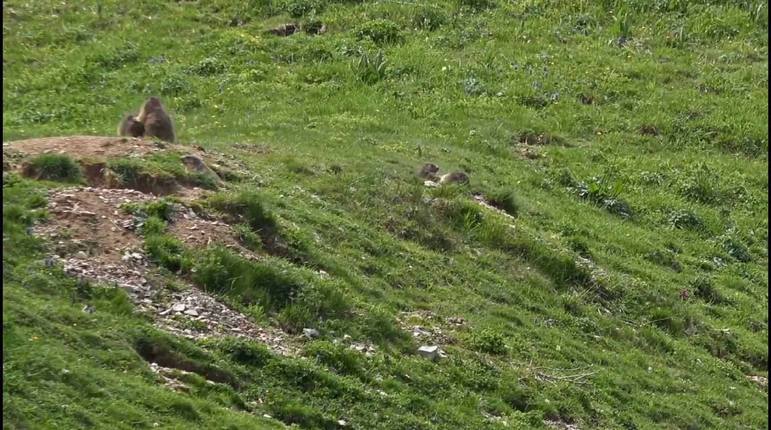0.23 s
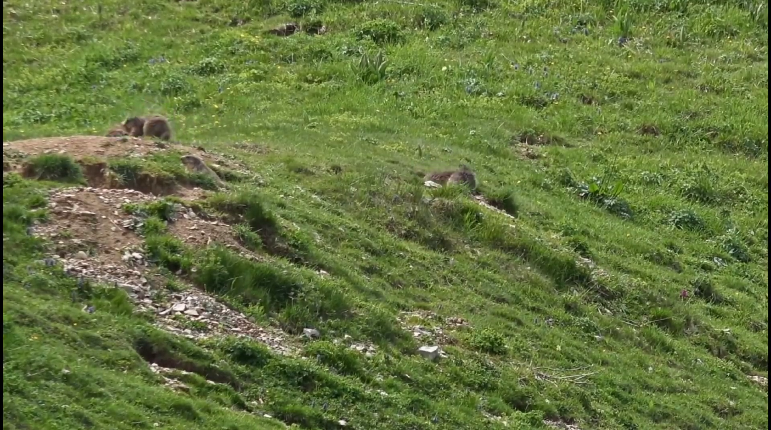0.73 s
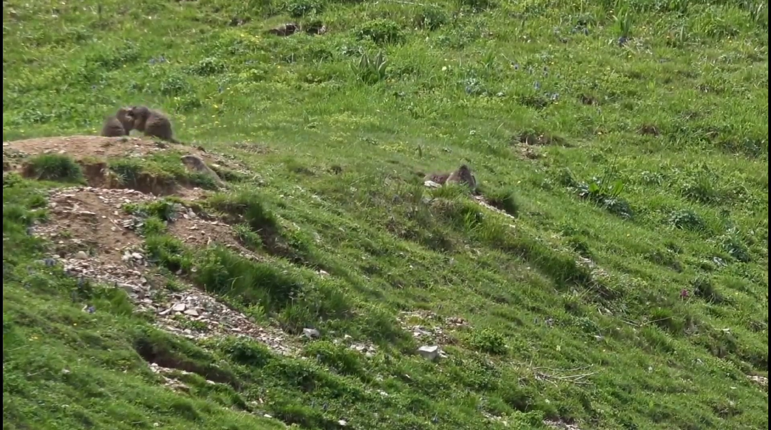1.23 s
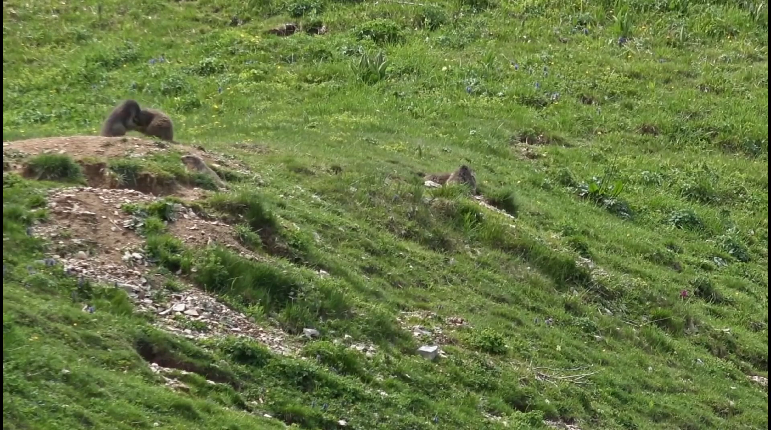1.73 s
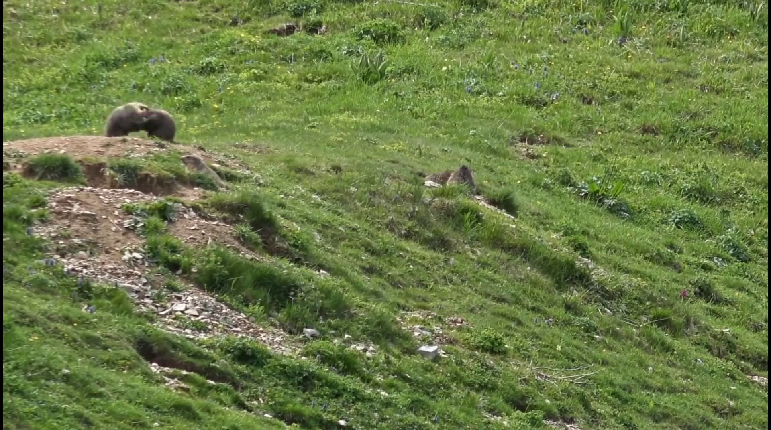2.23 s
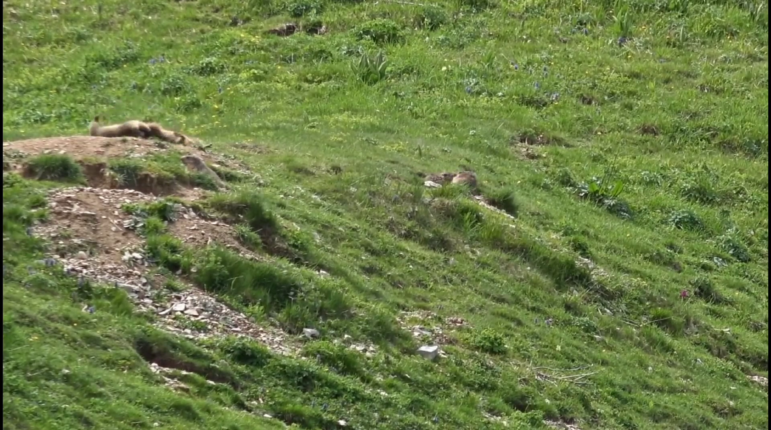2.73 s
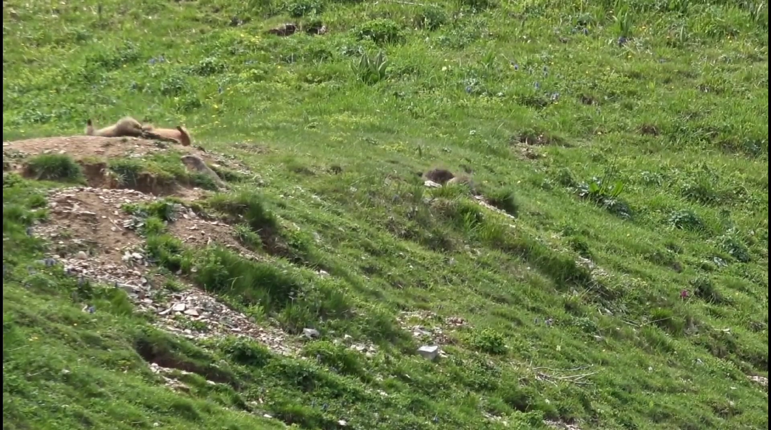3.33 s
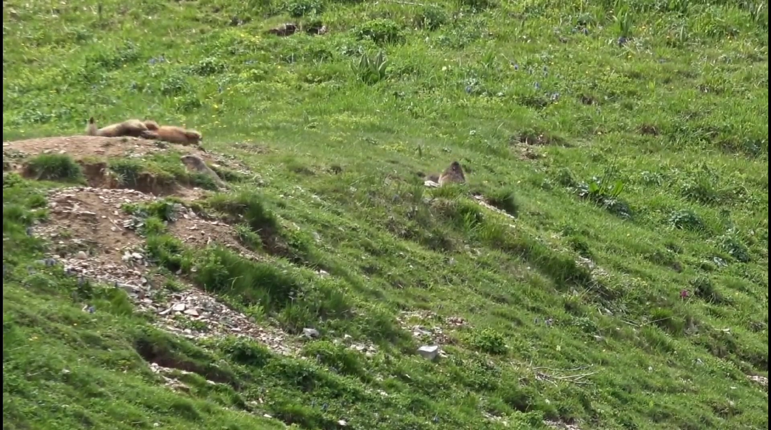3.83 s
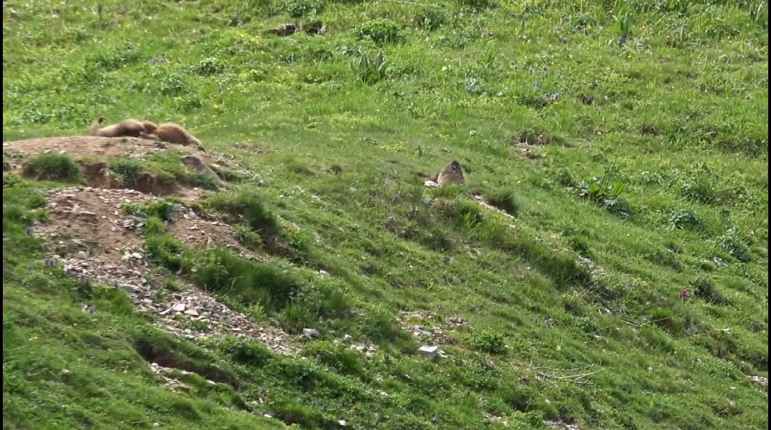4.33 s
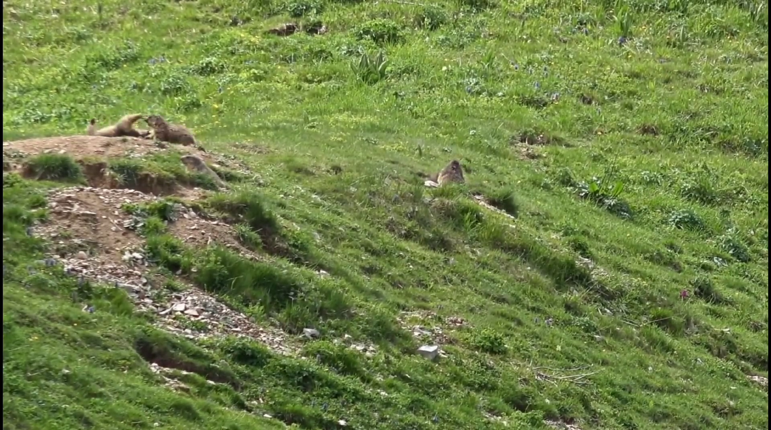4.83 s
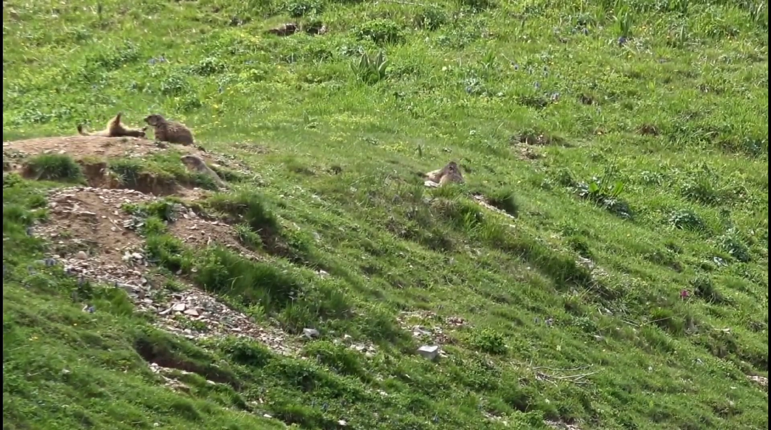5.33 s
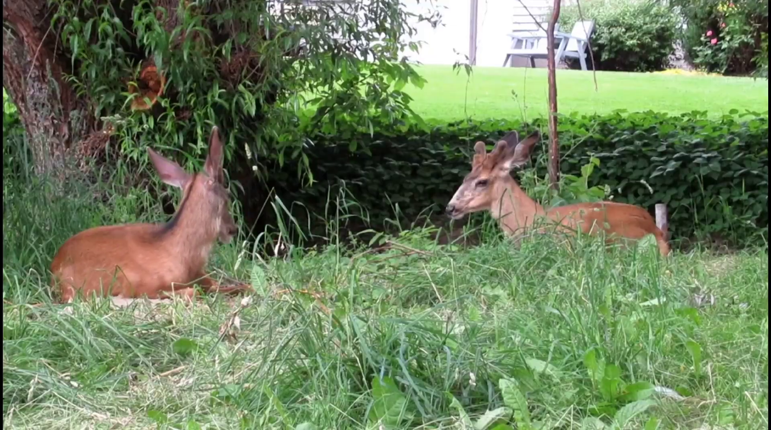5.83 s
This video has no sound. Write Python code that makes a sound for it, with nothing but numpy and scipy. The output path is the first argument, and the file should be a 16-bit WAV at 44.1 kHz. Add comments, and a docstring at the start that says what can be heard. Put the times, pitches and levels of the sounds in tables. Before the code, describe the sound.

Short, high marmot whistles repeat rapidly, each rising, falling and ending hoarse, over soft outdoor wind and faint, distant bird twitter. After a pause with one small click near the microphone comes a drawn-out squeal, then more whistles from ahead and the right, fading away with a slight echo off the slope. The background stops abruptly, and a deer's low, pulsing, chesty groan ends the scene.

```python
"""A mountain meadow in faint wind and hiss. Marmots squabble ahead of the microphone in a run of
short arched whistles, while a small bird twitters far off. Something clicks once, close by.
A long squeal opens a second run of whistles, which come by turns from the right and from ahead.
The meadow cuts to silence; then a large animal, perhaps a deer, gives a low groan a little to
the right, its slow glottal pulses ringing in chest and mouth."""
import sys
import numpy as np
from scipy import signal
from scipy.fft import rfft, irfft, next_fast_len
from scipy.io import wavfile
from scipy.ndimage import map_coordinates

SR = 44100
rng = np.random.default_rng(int(sys.argv[2]) if len(sys.argv) > 2 else 0)


def wav_out(sig):
    """Save sig, one row per channel (or a flat mono array), as 16-bit PCM at SR to the path in sys.argv[1]."""
    wavfile.write(sys.argv[1], SR, np.round(np.clip(np.atleast_2d(sig).T, -1, 1) * 32767).astype(np.int16))


N = 268613
TIME = np.arange(N) / SR

# Spectra of the wind with its hiss, and of the rumble under it: (frequency [Hz], relative level [dB])
WIND_SPECTRUM = [(20, -14), (60, 3), (90, -4), (130, -1.5), (200, -7.5), (450, -13), (750, -13),
                 (1100, -17), (2400, -26), (4000, -27), (8500, -26), (10000, -30.5), (12500, -28),
                 (15500, -30.5)]
RUMBLE_SPECTRUM = [(20, -12), (40, -13.5), (58, 4), (80, -7.5), (130, -13.5), (250, -29.5),
                   (1000, -90.5)]
# How alike the wind is on both sides of the microphone: (frequency [Hz], correlation [0-1])
WIND_LIKENESS = [(60, .6), (150, .85), (700, .85), (3000, 0.98), (8000, 0.22), (14000, 0.6)]
# Stereo balance of the wind, calls ahead and calls to the right: (frequency [Hz], left over right [dB])
WIND_BALANCE = [(60, -4), (160, -1), (430, -2), (1160, 0.5), (3130, 0.5), (8410, 0.0)]
AHEAD_BALANCE = [(60, -4.5), (140, 0.0), (310, -0.5), (710, 0.5), (1620, 0.5), (3690, -2.5), (8410, -5.0)]
RIGHT_BALANCE = [(60, -2.5), (140, -0.5), (310, -1.5), (710, -0.5), (1620, -2.5), (3690, -4.0), (8410, -10)]

# Marmot whistles; the six columns after the level are relative to it: (start [s], top [s], end [s],
# top pitch [Hz], level [dB], 2nd partial [dB], 3rd [dB], 4th [dB], upper partials [dB], soft start [dB],
# rasp [dB], side in the second run [0 ahead, 1 right])
WHISTLE_CALLS = [(-.075, -0.034, 0.033, 1454, -19, -6.5, -13.5, -15, -17.5, -12, -19, 0),
                 (.131, 0.158, .21, 1415, -16, -4.5, -17, -14.5, -21, -6.5, -23, 0.16),
                 (.308, .344, .4, 1529, -19, -10, -0.5, -9, -20.5, -15.5, -18, 0),
                 (.506, 0.542, 0.58, 1303, -23.5, 3.5, -2, -8, -17.5, -17, -17.5, 0),
                 (2.711, 2.745, 2.818, 1743, -28, -3.5, -12, -16, -17.5, -10, -23, 0.96),
                 (2.909, 2.948, 2.996, 1562, -23, -7, -12, -18.5, -14.5, -21.5, -25.5, 0.17),
                 (3.093, 3.134, 3.198, 1281, -24, -12.5, -18.5, -21.5, -21.5, -27, -27, 1),
                 (3.27, 3.311, 3.376, 1293, -21, -9.5, -17, -18.5, -14, -26, -28.5, 0.22),
                 (3.467, 3.505, 3.556, 1179, -25.5, -9.5, -7.5, -19, -10, -18.5, -30.5, 1),
                 (3.651, 3.694, 3.752, 1124, -28.5, -5, -6, -13.5, -9.5, -20.5, -27.5, 1),
                 (3.87, 3.9, 3.95, 1000, -38.5, -3, -7.5, -21, -13, -11.5, -22.5, 0.91),
                 (4.091, 4.122, 4.166, 996, -36, -4, -7.5, -18.5, -14, -15, -28.5, 1),
                 (4.301, 4.345, 4.396, 1059, -30.5, -3.5, -4.5, -22, -11, -15.5, -28, 1)]
# Throat resonances in a whistle, and the spectrum of hoarseness: (frequency [Hz], relative level [dB])
WHISTLE_THROAT = [(700, -1), (950, -6.5), (1300, -0.5), (1600, -4), (2050, -6.5), (2400, -6), (2850, -3.5),
                  (3150, -3.5), (3650, -2), (4150, -7.5), (4650, 0), (5400, -2.5), (8000, 6.5)]
RASP_SPECTRUM = [(500, -18.5), (750, -8.5), (1400, -8), (2000, -2), (2600, -1.5), (4300, -0.5), (7500, -5),
                 (8500, -14), (9500, -51.5)]
# Flips into the upper register: (up [s], down [s], pitch factor [ratio], level change [dB])
REGISTER_FLIPS = [(2.052, 2.191, 1.216, 3.5), (2.51, 2.547, 1.295, 3), (2.738, 2.756, 1.22, -4.5)]
# The voice tears beside a flip or as a hard call falls: (start [s], end [s], extra rasp [dB])
VOICE_TEARS = [(.168, .205, 4), (2.134, 2.205, 16.5), (2.479, 2.516, 11.5), (2.534, 2.582, 15.5),
               (2.75, 2.798, 9.5), (2.953, 3, 6.5)]

# Bouts of the distant bird: (start [s], phrases [count], phrase spacing [s], level [dB])
BIRD_BOUTS = [(.075, 1, 0, -58), (.58, 1, 0.021, -53), (1.2, 1, 0, -62.5), (1.465, 3, .215, -55),
              (2.6, 3, 0.23, -58), (3.525, 2, .243, -57.5), (4.235, 5, 0.27, -58)]
# The click near the microphone: (time [s], level [dB])
CLICK_HITS = [(1.593, -27)]
# Modes of the thing that clicks: (frequency [Hz], relative level [dB], time to fall 60 dB [s])
CLICK_MODES = [(1340, -16, 0.072), (1930, -6, 0.012), (2100, -2.5, 0.012), (4500, -8, 0.012),
               (7700, -1, 0.0067)]

# The trough in the middle of the squeal: (time [s], lower-register pitch [Hz])
SQUEAL_TROUGH = [(2.2, 1434), (2.242, 1366), (2.27, 1351), (2.316, 1247), (2.38, 1226), (2.458, 1243),
                 (2.482, 1315), (2.49, 1410)]
# Throat resonances in the squeal: (frequency [Hz], gain [dB])
SQUEAL_FORMANTS = [(1250, 0), (1900, -48), (2600, -6.5), (3750, -6.5), (4900, -13), (6200, -23.5),
                   (7400, -13.5), (8600, -17.5), (10000, -39)]

# Course of the groan: (time [s], chest level [dB], mouth level [dB])
GROAN_LEVELS = [(5.65, -40, -56), (5.694, -31, -44), (5.79, -35, -39.5), (5.84, -30.5, -50),
                (5.906, -33, -47.5), (5.952, -36.5, -38), (5.986, -36.5, -38.5), (6.018, -26.5, -35.5),
                (6.09, -34.5, -36)]
# Resonances of the chest and of the mouth, jaw shut and open: (frequency [Hz], width [Hz], gain [dB])
CHEST_MODES = [(158.5, 14, -6.5), (203.4, 13.6, 5.5)]
SHUT_MOUTH_MODES = [(380, 37, -12.5), (509, 63, -4), (654, 42, -1), (1022, 47, 0.5), (1220, 120, -3.5),
                    (1375, 39, 0.5), (1900, 90, -8), (2220, 120, -12), (2540, 100, -12), (3100, 100, -23.5)]
OPEN_MOUTH_MODES = [(367, 17, 1), (487, 140, -2.5), (571, 97, -3), (894, 42, -2), (1200, 110, -4.5),
                    (1333, 49, 2.5), (1904, 79, -4), (2106, 63, -12), (2253, 70, -8), (3220, 72, -26)]
# Faint rush under the groan: (frequency [Hz], relative level [dB])
RUSH_SPECTRUM = [(20, -13), (80, 1), (130, 5), (300, -9.5), (1500, -14), (4000, -30), (6000, -49),
                 (9000, -54), (12000, -81.5)]
# Stereo balance of the groan: (frequency [Hz], left over right [dB])
GROAN_BALANCE = [(180, -4.5), (310, -6), (600, -9), (3000, -8)]
# Phase of the groan at the microphone: (frequency [Hz], lead of the left side [rad])
GROAN_PHASE_LEAD = [(340, 0), (780, 1.1), (1030, 1.4), (2580, 3.6), (4300, 6)]

SQUEAL_START_S, SQUEAL_TOP_S, SQUEAL_END_S = 2.062, 2.526, 2.582


def amp(db):
    """Decibels to gain."""
    return 10 ** (np.asarray(db) / 20)


def along(points, hz):
    """Read (frequency [Hz], value) points on a log axis."""
    knots_hz, values = np.transpose(points)
    return np.interp(np.log(hz + 1), np.log(knots_hz + 1), values)


def curves(rows):
    """One value per sample for each column after the time."""
    times, *columns = np.transpose(rows)
    return [np.interp(TIME, times, column) for column in columns]


def ramp(x):
    """Hold within 0 to 1."""
    return np.clip(x, 0, 1)


def gate(start, end, fade_s):
    """1 between two times, with soft edges."""
    return ramp((TIME - start) / fade_s) * ramp((end - TIME) / fade_s)


def wobble(rate, size=N):
    """A smooth random curve, rate knots a second."""
    knots = rng.standard_normal(int(size * rate / SR) + 4)
    return map_coordinates(knots, [np.arange(size) * rate / SR])


def phase_of(hz):
    """Running phase of a changing frequency, in radians."""
    return 2 * np.pi * np.cumsum(hz) / SR


def filtered(x, response):
    """Filter by a complex response of frequency."""
    size = next_fast_len(N + SR // 2)
    return irfft(rfft(x, size) * response(np.fft.rfftfreq(size, 1 / SR)), size)[..., :N]


def noise(spectrum):
    """Coloured noise of rms 1."""
    x = filtered(rng.standard_normal(N), lambda hz: amp(along(spectrum, hz)))
    return x / np.sqrt(np.mean(x ** 2) + 1e-20)


def panned(x, balance):
    """Left and right levels that differ with frequency."""
    return filtered(x, lambda hz: amp(np.outer([.5, -.5], along(balance, hz))))


def scatter(x, t60, delay_s):
    """Diffuse echo from a noise tail of energy 1 that starts after a delay."""
    t = np.arange(SR // 2) / SR
    tail = rng.standard_normal(len(t)) * amp(-60 * t / t60) * (t > delay_s)
    return signal.fftconvolve(x, tail / np.linalg.norm(tail))[:N]


def wind(level_db=-55.5):
    """Faint wind and hiss around the microphone, wider at some frequencies than at others."""
    width = lambda hz: np.arccos(np.clip(along(WIND_LIKENESS, hz), -1, 1)) / 2
    mid = filtered(noise(WIND_SPECTRUM), lambda hz: np.cos(width(hz)))
    side = filtered(noise(WIND_SPECTRUM), lambda hz: np.sin(width(hz)))
    return amp(level_db + .4 * wobble(1.7)) * np.array([mid + side, mid - side])


def rumble(rest_db=-67, squeal_db=-60, lag_s=.055, width_s=.059, spread=.67):
    """A faint low rumble that swells with every call, more with the louder whistles."""
    swells = sum(amp(-33.5 + .65 * db) / (1 + ((TIME - start - lag_s) / width_s) ** 2) ** 2
                 for start, _, _, _, db, *_ in WHISTLE_CALLS)
    level = amp(rest_db) + swells + amp(squeal_db) * gate(SQUEAL_START_S, SQUEAL_END_S, .1)
    centre, left, right = (noise(RUMBLE_SPECTRUM) for _ in range(3))
    return level * (centre + spread * np.array([left, right]))


def arch(distance, roundness=.8):
    """Pitch drop 0-1 on either side of a call's top: round at first, then straight."""
    return (1 + roundness) * distance ** 2 / (distance + roundness)


def voice_breaks(flip_s=.0044, tear_s=.014):
    """Flips and tears: (upper register [0-1], pitch factor [ratio], level change [dB], rasp [dB])."""
    flipped = np.array([gate(up - flip_s / 2, down + flip_s / 2, flip_s)
                        for up, down, _, _ in REGISTER_FLIPS])
    _, _, ratio, db = np.transpose(REGISTER_FLIPS)
    tear_db = sum(extra_db * gate(start, end, tear_s) for start, end, extra_db in VOICE_TEARS)
    return flipped.sum(0), 1 + (ratio - 1) @ flipped, db @ flipped, tear_db


def whistles(easy_hz=935, end_ratio=.7, fade_db=-23, tail_bright_db=9, tail_rasp_db=11, fray_db=15):
    """Each marmot whistle arches up and down in pitch and turns hoarse as it falls."""
    voice, rasp = np.zeros(N), np.zeros(N)
    _, flip_ratio, flip_db, tear_db = voice_breaks()
    for start, top, end, top_hz, db, *low_partials_db, upper_db, soft_db, hoarse_db, _ in WHISTLE_CALLS:
        span = (TIME >= start) & (TIME < end)
        t = TIME[span]
        waver = lambda rate: np.resize(wobble(rate, size=SR // 4), len(t))
        to_top = ramp((top - t) / (top - start))
        fall = ramp((t - top) / (end - top))
        rasp_db = hoarse_db + tear_db[span]
        # it starts between an easy pitch and its top; a hoarser call starts higher
        start_hz = easy_hz + .32 * (top_hz - easy_hz) + 7 * (hoarse_db + 25)
        drop_hz = (top_hz - start_hz) * arch(to_top) + (top_hz - end_ratio * start_hz) * arch(fall)
        pitch = flip_ratio[span] * (top_hz - drop_hz)
        jitter = .0049 + .039 * fall ** 2 + .069 * amp(rasp_db)
        phase = phase_of(pitch * (1 + jitter * waver(700)))
        partial = lambda k: np.cos(k * phase + rng.uniform(0, 2 * np.pi))
        # the voice grows ragged and tapers off as the effort drops
        ragged_db = (.5 + 3 * fall ** 2) * waver(260)
        taper = ramp((t - start) / .007) * ramp((end - t) / .016)
        level = taper * amp(db + flip_db[span] + soft_db * to_top ** 2 + fade_db * fall ** 2 + ragged_db)
        # partials flare as they sweep through the throat's resonances
        flare_db = lambda k: along(WHISTLE_THROAT, k * pitch) - along(WHISTLE_THROAT, k * top_hz)
        tone = amp(flare_db(.93)) * np.cos(phase)
        for k in range(2, 11):
            base_db = low_partials_db[k - 2] if k < 5 else upper_db - 3 * np.log2(k * pitch / 6500)
            flicker_db = 3 * waver(70.5)
            tone += amp(base_db + flare_db(k) + tail_bright_db * fall ** 2 + flicker_db) * partial(k)
        # every other cycle differs, more so in the fall, adding lines halfway between the partials
        halves = sum(amp(along(RASP_SPECTRUM, k * pitch)) * partial(k) for k in np.arange(6) + .5)
        halves_db = 22 + 2.184 * hoarse_db + fray_db * fall + 2.5 * waver(54)
        voice[span] += level * (tone + amp(halves_db) * halves)
        rasp[span] += level * amp(rasp_db + tail_rasp_db * fall) * (1 + .36 * np.cos(phase))
    return voice + 1.34 * rasp * noise(RASP_SPECTRUM)


def marmots(ground_db=-17, slope_db=-27, edge_hz=8400):
    """The calls at the microphone, with quick scatter off the ground and a faint echo off the slope."""
    direct = filtered(whistles() + squeal(), lambda hz: 1 / np.sqrt(1 + (hz / edge_hz) ** 64))
    ground = np.array([scatter(direct, t60=.085, delay_s=.002) for _ in range(2)])
    slope = np.array([scatter(direct, t60=.27, delay_s=.03) for _ in range(2)])
    calls = direct + amp(ground_db) * ground + amp(slope_db) * slope
    right, = curves([(s, ramp(side)) for start, _, end, *_, side in WHISTLE_CALLS for s in (start, end)])
    right *= TIME > SQUEAL_END_S + .1  # all calls come from ahead until the squeal is over
    return panned(calls * (1 - right), AHEAD_BALANCE) + panned(calls * right, RIGHT_BALANCE)


def bird(note_hz=4790, droop_hz=460, note_s=.017, step_s=.031, phrase_fade_db=-1.6, blur_db=-4):
    """A small bird far off: phrases of three tiny notes, each bending downward, blurred by distance."""
    song = np.zeros(N)
    phrases = [(start + n * spacing, db + n * phrase_fade_db)
               for start, count, spacing, db in BIRD_BOUTS for n in range(round(count))]
    for start, db in phrases:
        for k in range(3):
            span = abs(TIME - start - k * step_s) < note_s / 2
            progress = np.linspace(0, 1, span.sum())
            pitch = note_hz * (1 + .012 * rng.normal()) - droop_hz * progress ** 2
            note = np.sin(np.pi * progress) * np.sin(phase_of(pitch))
            song[span] += amp(db + 2.5 * rng.normal()) * note
    return np.array([song + amp(blur_db) * scatter(song, t60=.14, delay_s=.005) for _ in range(2)])


def click(ring_db=-3, crack_db=-5, crack_t60=.013):
    """A small hard tick close to the microphone: a crack of noise and a brief ring."""
    out, t = np.zeros(N), np.arange(SR // 10) / SR
    for start, db in CLICK_HITS:
        ring = sum(amp(mode_db - 60 * t / t60) * np.sin(2 * np.pi * hz * t)
                   for hz, mode_db, t60 in CLICK_MODES)
        crack = amp(crack_db - 60 * t / crack_t60) * rng.standard_normal(len(t))
        out[round(start * SR):][:len(t)] += amp(db) * (amp(ring_db) * ring + crack)
    return out


def squeal_contour(sag_hz_per_s=980, top_hz=1613, end_hz=772, base_db=-28, fade_db=-34, attack_s=.04):
    """The squeal sags, sinks through a long trough and ends in an arch; register flips lift its pitch."""
    trough, = curves(SQUEAL_TROUGH)
    first_s, (last_s, last_hz) = SQUEAL_TROUGH[0][0], SQUEAL_TROUGH[-1]
    to_top = ramp((SQUEAL_TOP_S - TIME) / (SQUEAL_TOP_S - last_s))
    fall = ramp((TIME - SQUEAL_TOP_S) / (SQUEAL_END_S - SQUEAL_TOP_S))
    pitch = trough + sag_hz_per_s * np.maximum(first_s - TIME, 0)
    pitch += (top_hz - last_hz) * (1 - arch(to_top)) - (top_hz - end_hz) * arch(fall)
    flipped, flip_ratio, flip_db, tear_db = voice_breaks()
    attack = ramp((TIME - SQUEAL_START_S) / attack_s)
    # it falters after its first drop of register, then recovers
    since_drop = TIME - REGISTER_FLIPS[0][1]
    falter_db = -7 * (1 - flipped) * np.exp(-(since_drop / .026) ** 2)
    effort_db = .0106 * (trough - np.mean(SQUEAL_TROUGH, axis=0)[1])  # louder where it is higher
    level = attack * amp(base_db + effort_db + flip_db + falter_db + fade_db * fall ** 2)
    overtone_db = 4 - 7 * flipped + 14 * fall  # purer in the upper register, brighter as it fades
    roughness = amp(-23 + tear_db)
    return pitch * flip_ratio, level, overtone_db, roughness


def squeal(flutter_hz=175, flutter_depth=.42, jitter=.038, grit=.68):
    """A marmot's long clean tone; a second, slow vibration roughens it where the register breaks."""
    pitch, level, overtone_db, roughness = squeal_contour()
    flutter = np.sin(phase_of(flutter_hz * (1 + .12 * wobble(60))))
    drift = .001 * wobble(120)
    phase = phase_of(pitch * (1 + drift + jitter * roughness * (flutter + wobble(600))))
    # the roughness clusters around each partial
    partial = lambda k: np.cos(k * phase) * (1 + grit * np.sqrt(k) * roughness * wobble(700))
    overtones = sum(amp(along(SQUEAL_FORMANTS, k * pitch) + wobble(40)) * partial(k) for k in range(2, 8))
    tone = (partial(1) + amp(overtone_db) * overtones) * (1 + flutter_depth * roughness * flutter)
    rasp = .16 * roughness * noise(RASP_SPECTRUM)
    return level * gate(SQUEAL_START_S, SQUEAL_END_S, .0032) * (tone + rasp)


def resonances(modes, hz):
    """Causal response of a set of resonances, added with alternating signs."""
    return sum((-1) ** k * amp(db) * 1j * hz * width / (centre ** 2 - hz ** 2 + 1j * hz * width)
               for k, (centre, width, db) in enumerate(modes))


def groan(start_s=5.649, jaw_opens_s=5.88, shut_hz=51.83, open_hz=57.16, hoarse_db=-22, rush_db=-54):
    """A large animal's slow glottal pulses boom in the chest and rattle the mouth as the jaw opens."""
    chest_db, mouth_db = curves(GROAN_LEVELS)
    jaw = ramp((TIME - jaw_opens_s) / .06)
    pulse_hz = (shut_hz + (open_hz - shut_hz) * jaw) * (1 + .025 * wobble(70))
    cycles = np.cumsum(pulse_hz * (TIME >= start_s)) / SR
    pulses = np.diff(np.ceil(cycles), prepend=0) * (TIME < TIME[-1] - .01)
    unit_rms = lambda x: x / np.sqrt(np.mean(x[TIME >= start_s] ** 2))
    chest = filtered(pulses, lambda hz: resonances(CHEST_MODES, hz) * resonances([(179, 43, 0)], hz))
    # each pulse lets a short puff of turbulent air through
    puffs = pulses * amp(.78 * wobble(50))
    puffs += amp(hoarse_db) * (cycles > 0) * np.exp(-6 * (cycles % 1)) * rng.standard_normal(N)
    through = lambda modes: unit_rms(
        filtered(puffs, lambda hz: resonances(modes, hz) / (1 + (hz / 4300) ** 6)))
    mouth = np.sqrt(1 - jaw) * through(SHUT_MOUTH_MODES) + np.sqrt(jaw) * through(OPEN_MOUTH_MODES)
    mouth += amp(-2) * scatter(mouth, t60=.093, delay_s=.0036)
    rush = amp(rush_db) * noise(RUSH_SPECTRUM) * gate(start_s, TIME[-1], .024)
    voice = amp(chest_db) * unit_rms(chest) + amp(mouth_db) * unit_rms(mouth) + rush
    left_lead = lambda hz: np.exp(1j * np.outer([.5, -.5], along(GROAN_PHASE_LEAD, hz)))
    return filtered(panned(voice, GROAN_BALANCE), left_lead)


def scene(cut_s=5.507):
    """The meadow until it cuts to silence, then the groan."""
    meadow = marmots() + bird() + click() + panned(wind() + rumble(), WIND_BALANCE)
    return meadow * gate(-1, cut_s, .012) + groan()


def record(dry, top_hz=15500):
    """Nothing is kept above the band limit."""
    return filtered(dry, lambda hz: hz < top_hz)


dry = scene()
out = record(dry)
wav_out(out)
```